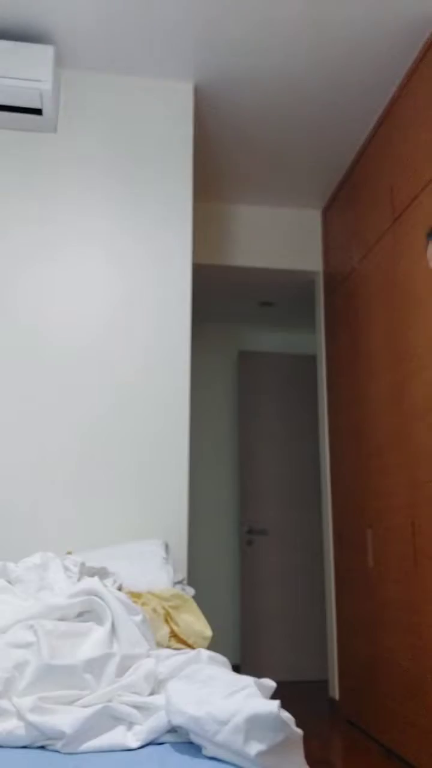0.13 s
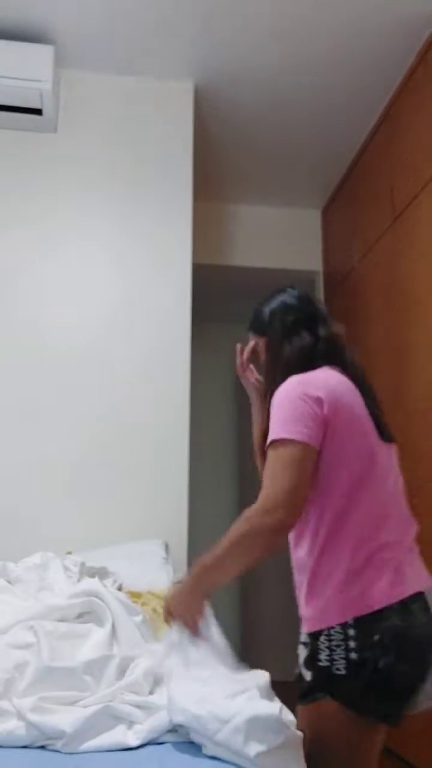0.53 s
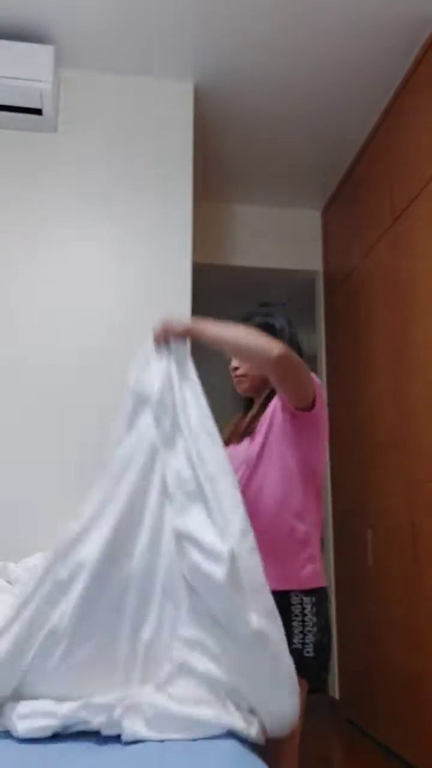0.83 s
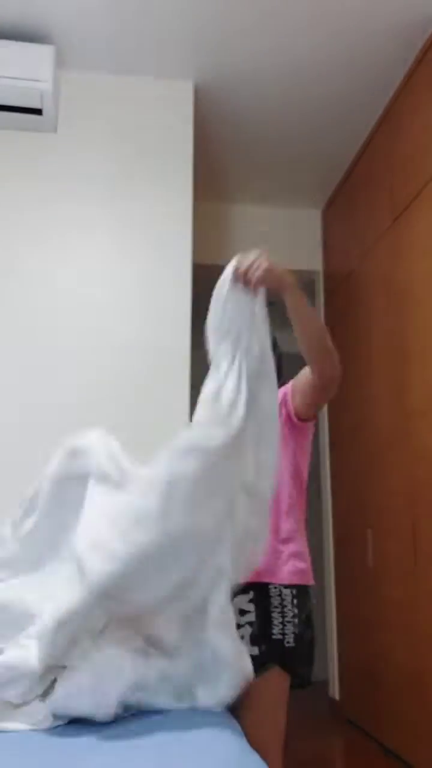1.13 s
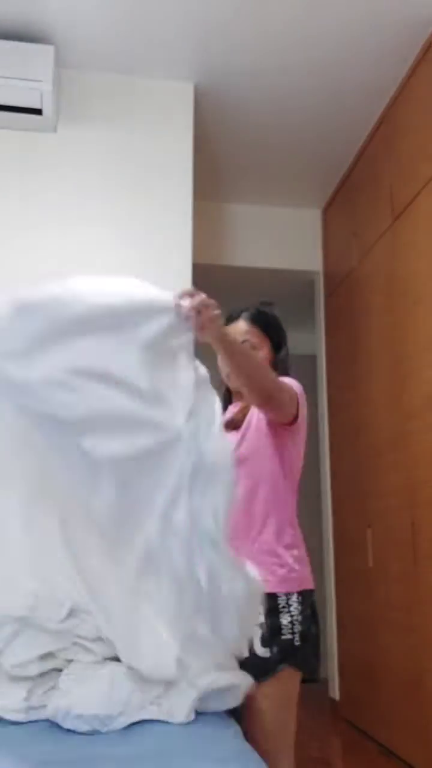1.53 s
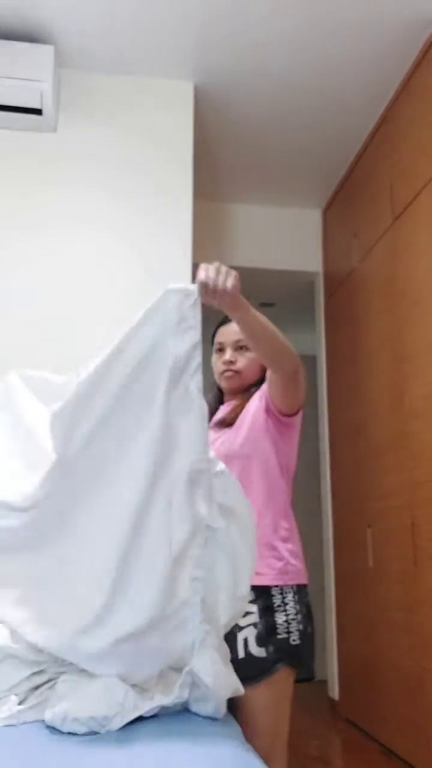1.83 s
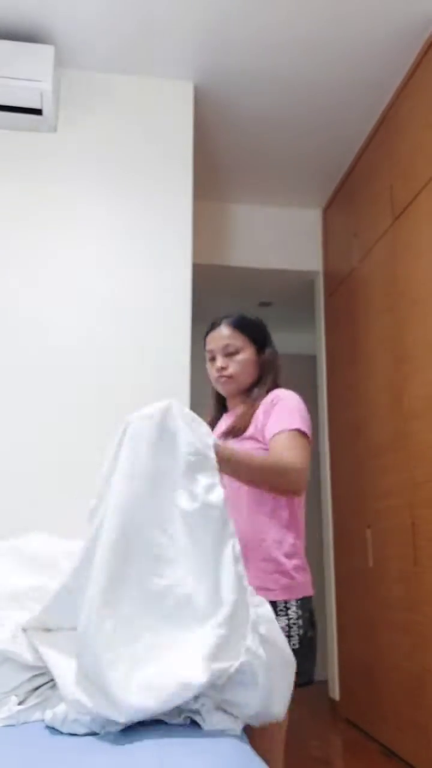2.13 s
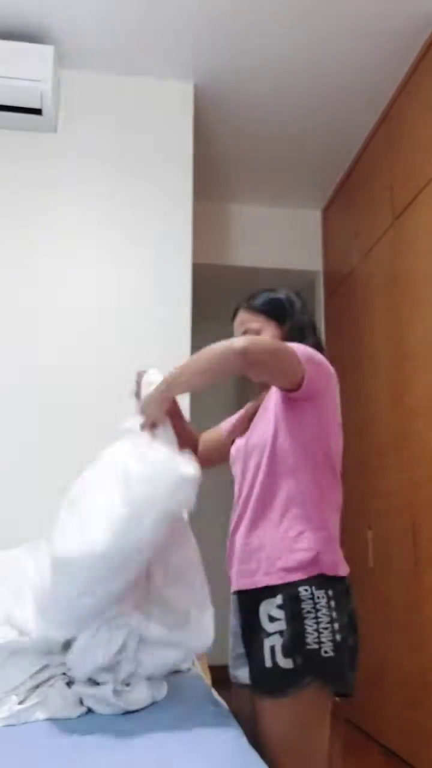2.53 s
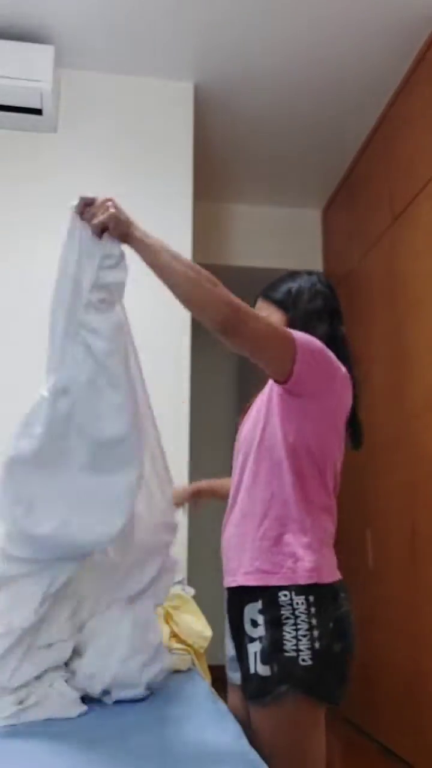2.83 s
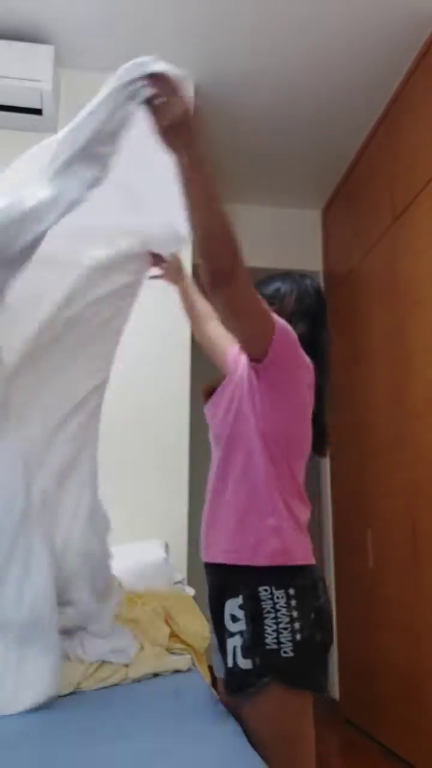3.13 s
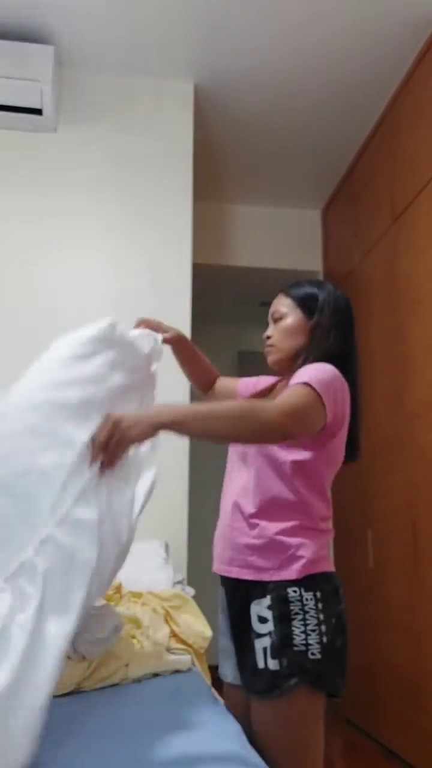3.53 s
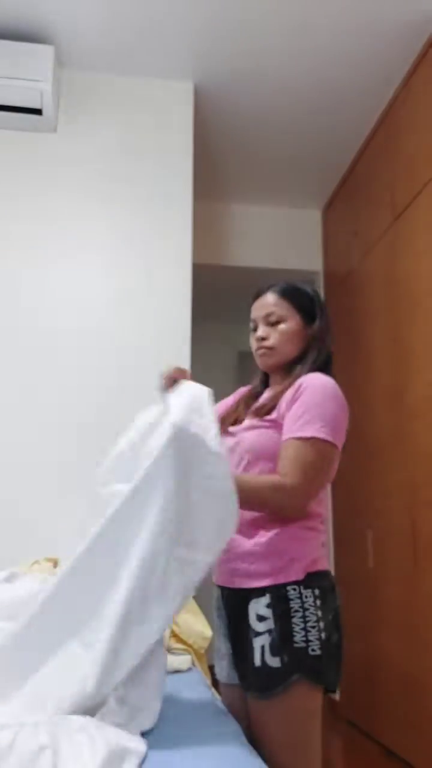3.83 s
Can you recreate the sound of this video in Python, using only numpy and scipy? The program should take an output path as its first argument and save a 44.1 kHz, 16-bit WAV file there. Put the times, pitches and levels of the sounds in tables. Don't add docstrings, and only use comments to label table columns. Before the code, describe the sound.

A cotton sheet is lifted and shaken with rustles, dull flaps and snaps, gathered more softly, then snapped hardest near the end; small bedroom, close stereo microphone, faint cooler hum.

```python
import sys
import numpy as np
from scipy import signal
from scipy.fft import rfft, irfft, next_fast_len
from scipy.io import wavfile
from scipy.ndimage import uniform_filter1d, map_coordinates

SR = 44100
rng = np.random.default_rng(int(sys.argv[2]) if len(sys.argv) > 2 else 0)


def gain_from_db(level_db):
    decades = np.asarray(level_db, float) / 20
    return 10 ** decades


def unload_audio(sound):
    columns = np.transpose(np.atleast_2d(sound))
    steps = np.round(np.clip(columns, -1, 1) * 32767)
    wavfile.write(sys.argv[1], SR, steps.astype(np.int16))


N = 176400


def unit(x):
    return x / np.sqrt(np.mean(x ** 2) + 1e-20)


def along(points, hz):
    table_hz, value = np.transpose(points)
    return np.interp(np.log(hz + 1), np.log(table_hz + 1), value)


def clock():
    return np.arange(N) / SR


def wobble(rate_hz):
    knots = rng.standard_normal((3, int(N * rate_hz / SR) + 4))
    shared, left, right = [map_coordinates(k, [clock() * rate_hz]) for k in knots]
    return np.array([shared + left, shared + right]) / np.sqrt(2)


def filtered(x, response):
    size = next_fast_len(x.shape[-1] + 8192)
    spectrum = rfft(x, size) * response(np.fft.rfftfreq(size, 1 / SR))
    return irfft(spectrum, size)[..., :x.shape[-1]]


def cloth(spectrum, patchy_db, grain_rate, grain_db):
    noise = signal.stft(rng.standard_normal((2, N)), nperseg=512)[2]
    patches = uniform_filter1d(rng.standard_normal(noise.shape[1:]), size=8, axis=0)
    patches = uniform_filter1d(patches, size=7, axis=1)
    rub = unit(signal.istft(noise * gain_from_db(patchy_db * unit(patches)), nperseg=512)[1][:, :N])
    clicking = rng.random(N) < grain_rate / SR
    click_size = gain_from_db(1.3 * np.minimum(rng.exponential(size=N), 2.5))
    clicks = unit(clicking * click_size * rng.standard_normal((2, N)))
    return unit(filtered(rub + gain_from_db(grain_db) * clicks, lambda hz: gain_from_db(along(spectrum, hz))))


def swell(t, width_s, lean):
    half_width = np.where(t < 0, 1 / lean, lean) * width_s / 2
    return gain_from_db(-6 * (np.abs(t) / half_width) ** 1.51)


def pockets(rows, colour, follow, ring_db, lean):
    shared, left_leads_s = 0.38, 0.003953
    ring_q = 9
    tone = 0.65
    out = np.zeros((2, N + SR))
    t = np.arange(SR // 2) / SR - 0.25
    for peak_s, width_s, db, hz in rows:
        pocket_db = ring_db + 6.4 * (hz > 1000)

        def response(f):
            damping = 1j * f * hz / ring_q
            ring = 1 + gain_from_db(pocket_db) * damping / (hz * hz - f * f + damping)
            return gain_from_db(along(colour, f * (300 / hz) ** follow)) * ring

        common, own = rng.standard_normal(len(t)), rng.standard_normal((2, len(t)))
        both = np.array([common, np.roll(common, round(left_leads_s * SR))])
        gust = filtered(shared * both + (1 - shared) * own, response)
        shape = swell(t, width_s, lean)
        gust /= np.sqrt(np.sum((gust * shape) ** 2, axis=1, keepdims=True) / np.sum(shape ** 2))
        drift = 3 * uniform_filter1d(own, size=2000).cumsum(axis=1) / SR * hz
        clean = np.sin(2 * np.pi * hz * t + drift + common[:2, None])
        pocket = shape * (gust + tone * (hz < 3000) * clean)
        out[:, round(peak_s * SR) + SR // 4:][:, :len(t)] += gain_from_db(db + 4) * pocket
    return out[:, SR // 2:][:, :N]


# (pitch_hz [Hz], level_db [dB per Hz])
FAN_COLOUR = [(300, -4.5), (700, -9), (1500, -15), (2300, -12), (3200, -16), (3450, -35), (8000, -31),
              (15700, -16)]


def fan():
    level_db = -64.5 + 1.2 * wobble(6.7)
    return gain_from_db(level_db) * cloth(FAN_COLOUR, patchy_db=2.5, grain_rate=1000, grain_db=-36)


# (start_s [s], length_s [s])
HUM_TIMES = [
    (0.29, 0.036),
    (1.196, 0.05),
    (1.45, .07),
    (1.795, 0.065),
    (2.004, 0.043),
    (2.108, 0.08),
    (2.24, 0.12),
    (2.56, 0.068),
    (3.58, 0.058),
    (3.853, 0.04),
]


def hum():
    hum_hz, width_hz, edge_s = 378, 24, 0.015
    level_db, under_db = -62.5, -13
    t = clock()
    up = gain_from_db(under_db)
    for start_s, length_s in HUM_TIMES:
        outside_s = np.maximum(np.abs(t - start_s - length_s / 2) - length_s / 2, 0)
        up = up + np.exp(-(outside_s / edge_s) ** 2)
    noise = rng.standard_normal((2, N))
    breath = unit(filtered(noise, lambda hz: 1 / (1 + (2 * (hz - hum_hz) / width_hz) ** 2)))
    tone = 2.65 * np.sin(2 * np.pi * hum_hz * t + wobble(20))
    return gain_from_db(level_db) * up * (breath + tone)


# (pitch_hz [Hz], level_db [dB per Hz])
DRAUGHT_COLOUR = [(15, -26), (28, -31), (52, -8.5), (80, -3), (120, -1), (900, -100)]
# (pitch_hz [Hz], level_db [dB per Hz])
PUFF_COLOUR = [(100, -46), (200, 13), (300, 18.5), (450, 8.5), (3000, -100)]
# (peak_s [s], level_db [dB], pitch_hz [Hz])
PUFF_TIMES = [(.648, -74, 60.6), (0.968, -60, 55), (1.157, -54, 54.7), (1.357, -56, 117), (1.415, -51, 60),
              (1.521, -45.5, 125), (1.722, -57, 56), (1.818, -53, 119), (1.879, -54, 60),
              (1.957, -47, 53.2), (2.178, -52.5, 52), (2.355, -59, 54), (2.781, -53.5, 117),
              (2.878, -54.5, 56), (2.998, -53.5, 121), (3.057, -58, 52), (3.274, -58, 56),
              (3.386, -47, 54.3), (3.882, -56.5, 112)]


def air():
    arriving = np.clip((clock() - 0.3) / 0.087, 0, 1)
    level_db = -56.5 + 3 * wobble(12)
    draught = gain_from_db(level_db) * cloth(DRAUGHT_COLOUR, patchy_db=2, grain_rate=50, grain_db=-10)
    width_s, louder_db = 0.063, 3.5
    puffs = [(peak_s, width_s, db + louder_db, hz) for peak_s, db, hz in PUFF_TIMES]
    return arriving * draught + pockets(puffs, PUFF_COLOUR, follow=1.0, ring_db=23, lean=1.1)


# (pitch_hz [Hz], level_db [dB per Hz])
HEAP_COLOUR = [(76, -4), (130, -1.5), (377, -3.5), (442, -8.5), (574, -11), (1500, -24), (2070, -20.5),
               (15700, -38)]
# (time_s [s], level_db [dB])
STIRRING = [(0.4, -70.5), (0.56, -70), (.9, -63), (1.22, -62.5), (1.9, -63), (2.1, -63.5), (2.5, -65.5),
            (2.9, -61), (3.5, -61), (3.9, -65), (4.0, -62.5)]


def heap():
    level_db = np.interp(clock(), *np.transpose(STIRRING)) + 10.5 + 2 * wobble(7.8)
    return gain_from_db(level_db) * cloth(HEAP_COLOUR, patchy_db=1.3, grain_rate=1500, grain_db=-10)


# (pitch_hz [Hz], level_db [dB per Hz])
SLIDE_COLOUR = [(880, -10), (1500, -3.5), (2480, -5), (2960, -8), (4740, -5.5), (5770, -15), (14000, -13.5),
                (15700, -20)]
# (start_s [s], length_s [s], level_db [dB])
SLIDE_TIMES = [(0.597, 0.007, -64.5), (0.637, 0.025, -61), (0.769, 0.053, -61.5), (0.97, 0.086, -67.5),
               (1.063, 0.042, -52.5), (1.12, 0.044, -55.5), (1.173, 0.017, -51), (1.339, 0.12, -60.5),
               (1.504, 0.047, -56), (1.559, 0.031, -52), (1.618, 0.033, -57.5), (1.682, 0.0087, -53),
               (1.712, 0.089, -57), (2.03, 0.033, -71.5), (2.166, 0.055, -66), (2.244, 0.03, -60.5),
               (2.316, .03, -67), (2.38, 0.033, -66.5), (2.467, 0.088, -72), (2.576, 0.065, -67.5),
               (2.687, 0.036, -68.5), (2.747, 0.2, -64.5), (2.94, 0.05, -57.5), (2.996, 0.039, -51.5),
               (3.052, 0.06, -51), (3.207, 0.054, -56), (3.28, 0.12, -55), (3.423, 0.14, -67),
               (3.606, 0.11, -66.5), (3.716, 0.08, -65), (3.84, 0.014, -66), (3.875, .008, -66.5),
               (3.982, .03, -66)]


def slides():
    attack_s, release_s = 0.011, 0.028
    t = clock()
    power = 0
    for start_s, length_s, db in SLIDE_TIMES:
        rise = np.minimum(t - start_s, 0) / attack_s
        fall = np.maximum(t - start_s - length_s, 0) / release_s
        power = power + gain_from_db(2 * db) * np.exp(2 * rise - 2 * fall)
    gain = gain_from_db(5) * np.sqrt(power) * gain_from_db(wobble(70))
    return gain * cloth(SLIDE_COLOUR, patchy_db=1, grain_rate=2500, grain_db=-9)


# (pitch_hz [Hz], level_db [dB per Hz])
CREASE_COLOUR = [(250, -22), (500, 0.5), (900, 0), (1500, -5), (2500, -12.5), (5000, -30.5), (8000, -35),
                 (16000, -66)]
# (peak_s [s], width_s [s], level_db [dB])
CREASE_TIMES = [(.643, 0.038, -78), (0.759, 0.1, -55.5), (1, 0.051, -55), (1.068, 0.039, -44.5),
                (1.145, 0.048, -44.5), (1.219, 0.028, -45.5), (1.341, 0.072, -48), (1.385, 0.12, -49.5),
                (1.5, 0.045, -42.5), (1.574, 0.051, -46.5), (1.69, 0.059, -48.5), (1.735, 0.096, -54),
                (1.809, 0.03, -52), (2.05, 0.066, -66.5), (2.248, 0.081, -54.5), (2.389, 0.07, -61.5),
                (2.328, 0.027, -65), (2.488, 0.039, -58.5), (2.56, 0.072, -62.5), (2.631, 0.04, -56.5),
                (2.7, 0.064, -58.5), (2.924, .025, -55), (2.761, 0.072, -52.5), (2.856, 0.043, -53.5),
                (2.81, .06, -68), (2.998, 0.072, -45), (3.09, 0.19, -57.5), (3.258, 0.085, -40),
                (3.329, 0.073, -43), (3.626, 0.15, -59.5), (3.71, 0.061, -52), (3.85, 0.047, -59),
                (3.97, 0.064, -59.5)]


def crumples():
    power = 0
    for peak_s, width_s, db in CREASE_TIMES:
        power = power + (gain_from_db(db) * swell(clock() - peak_s, width_s, lean=1.52)) ** 2
    gain = gain_from_db(5) * np.sqrt(power) * gain_from_db(wobble(60))
    return gain * cloth(CREASE_COLOUR, patchy_db=1.5, grain_rate=700, grain_db=-5)


# (pitch_hz [Hz], level_db [dB per Hz])
FOLD_COLOUR = [(80, -3), (170, 1.5), (300, 2), (700, -7), (1300, -19.5), (16000, -79)]
# (peak_s [s], width_s [s], level_db [dB], pitch_hz [Hz])
FLAP_TIMES = [(.643, 0.024, -57, 1960), (3.0, 0.017, -39.5, 1390), (.77, 0.048, -55.5, 293),
              (.845, 0.025, -49, 435), (.954, 0.029, -50.5, 367), (1.072, 0.035, -41.5, 302),
              (1.155, 0.045, -39, 447), (1.225, 0.036, -50, 364), (1.335, 0.024, -45.5, 603),
              (1.39, 0.059, -37.5, 243.7), (1.515, 0.071, -41.5, 315), (1.571, 0.045, -42.5, 335),
              (1.62, 0.048, -44.5, 219), (1.72, 0.055, -40, 307), (1.809, 0.061, -48.5, 225),
              (.55, 0.19, -65.5, 402), (2.008, 0.074, -55, 231), (2.241, 0.096, -52.5, 229),
              (2.322, 0.019, -49, 454), (2.6, 0.078, -54.5, 151), (2.77, 0.025, -41.5, 361),
              (2.855, 0.05, -48.5, 257), (2.995, 0.053, -44.5, 190.4), (3.08, 0.18, -50.5, 325),
              (3.215, 0.031, -43.5, 456), (3.256, 0.022, -29.5, 515), (3.255, 0.033, -33.5, 715),
              (3.262, 0.057, -36.5, 997), (3.272, 0.073, -33, 274.4), (3.3, 0.027, -43.5, 896),
              (3.252, 0.042, -50, 2060), (3.356, 0.037, -29.5, 226.4), (3.387, 0.021, -39, 258),
              (1.078, 0.024, -50, 970), (1.497, 0.03, -48, 407), (3.6, 0.1, -54, 234),
              (3.72, 0.025, -39.5, 252), (3.855, 0.014, -60, 7880)]


def flaps():
    return pockets(FLAP_TIMES, FOLD_COLOUR, follow=0.8, ring_db=7, lean=1.17)


# (start_s [s], level_db [dB at the peak], pitch_hz [Hz])
SNAP_TIMES = [(0.842, -53, 401), (0.995, -44, 1010), (1.061, -27, 396), (1.069, -36, 960),
              (1.132, -40, 484), (1.15, -34, 474), (1.213, -36, 961), (1.381, -28, 576), (1.416, -38, 883),
              (1.495, -17, 401), (1.509, -43, 458), (1.553, -26, 982), (1.678, -46, 1340),
              (1.677, -31.5, 425), (1.775, -32, 937), (1.806, -28, 600), (2.235, -34, 802),
              (2.376, -41, 1190), (2.484, -37, 896), (2.633, -51, 595), (2.746, -39, 401),
              (2.766, -36, 403), (2.849, -47, 401), (2.919, -41, 506), (2.965, -28.5, 370),
              (2.993, -37, 1360), (3.232, -33, 1050), (3.247, -12, 480), (3.271, -29, 482),
              (3.305, -16.5, 505), (3.699, -32, 404), (3.856, -34.5, 447)]


def snaps():
    ring_cycles = 3.8
    crack_share, crack_s = 0.1, 0.0033
    out = np.zeros((2, N + SR))
    t = np.arange(SR // 20) / SR
    for start_s, db, hz in SNAP_TIMES:
        phase = 0.83 * rng.uniform(-2.5, 1, (2, 1))
        onset = np.minimum(2 * t * hz, 1)
        ring = np.sin(2 * np.pi * hz * t + phase) * gain_from_db(-20 * t * hz / ring_cycles) * onset
        crack = crack_share * rng.standard_normal((2, len(t))) * np.exp(-t / crack_s)
        out[:, round(start_s * SR):][:, :len(t)] += gain_from_db(db - 3) * (ring + crack)
    return filtered(out[:, :N], lambda hz: 1 / (1 + (hz / 4500) ** 2))


# (pitch_hz [Hz], time_s [s to fall by 60 dB])
ROOM_RING = [(100, 0.24), (1000, 0.29), (10000, 0.14)]


def bedroom(x):
    hz, t, noise = signal.stft(rng.standard_normal((2, SR // 2)), SR, nperseg=256)
    decay = gain_from_db(-60 * t / along(ROOM_RING, hz)[:, None])
    tail = signal.istft(noise * decay, SR, nperseg=256)[1]
    return signal.fftconvolve(x, tail / np.linalg.norm(tail[0]), axes=1)[:, :N]


def scene():
    sheet = slides() + crumples() + flaps() + snaps()
    room_db = -12.5
    return fan() + hum() + air() + heap() + gain_from_db(room_db) * bedroom(sheet) + sheet


# (pitch_hz [Hz], level_db [dB, left over right])
PORT_COLOUR = [(60, 3), (150, 0.5), (380, -2.5), (950, -3.5), (2380, -2), (5980, 2.5), (15000, -11)]


def two_ports(dry):
    side = np.array([[0.5], [-0.5]])
    return filtered(dry, lambda hz: gain_from_db(along(PORT_COLOUR, hz) * side) * (hz < 15800))


# (time_s [s], level_db [dB])
FADE_IN = [
    (0, -56),
    (.157, -59),
    (.18, -35.5),
    (.3, -23),
    (0.429, -11),
    (.5, -2.5),
    (4, -1.5),
]


def fade_in():
    opens_s = FADE_IN[1][0]
    return gain_from_db(np.interp(clock(), *np.transpose(FADE_IN))) * (clock() > opens_s)


def roll_off(x):
    return signal.sosfilt(signal.butter(12, 15880, fs=SR, output="sos"), x)


def record(dry):
    gain = fade_in()
    self_noise = gain_from_db(-101) * (gain > 0) * rng.standard_normal(dry.shape)
    mix = two_ports(dry) * gain + self_noise
    return roll_off(mix)


dry = scene()
out = record(dry)
unload_audio(out)
```